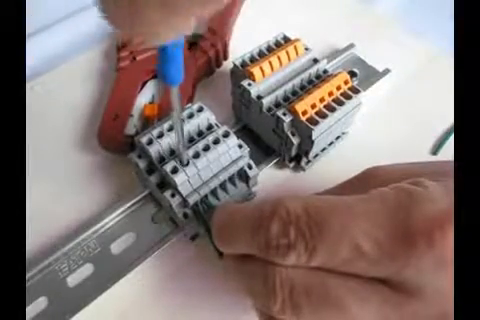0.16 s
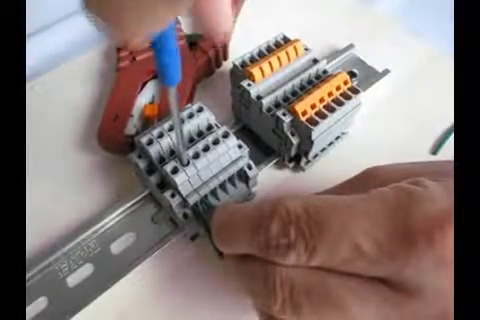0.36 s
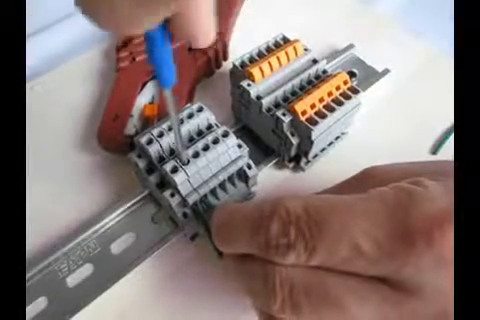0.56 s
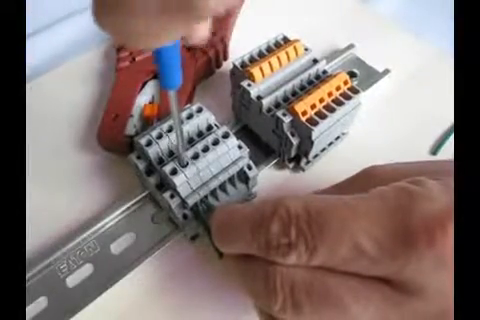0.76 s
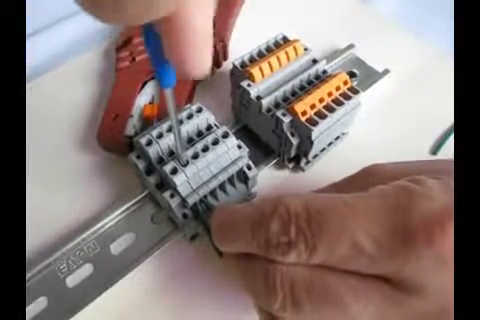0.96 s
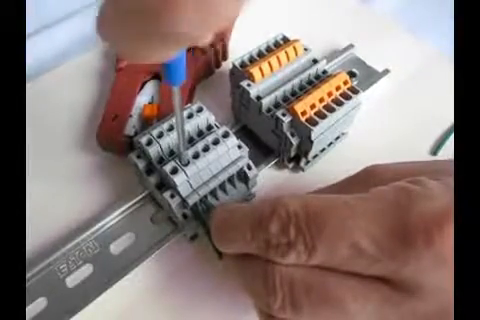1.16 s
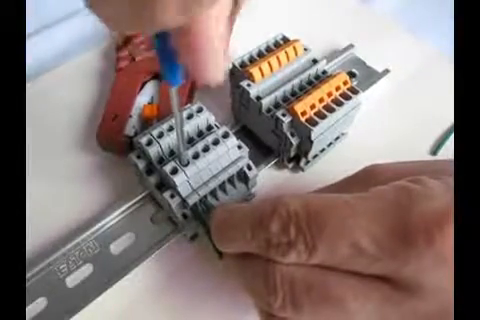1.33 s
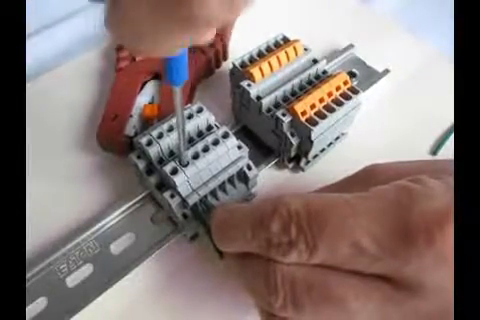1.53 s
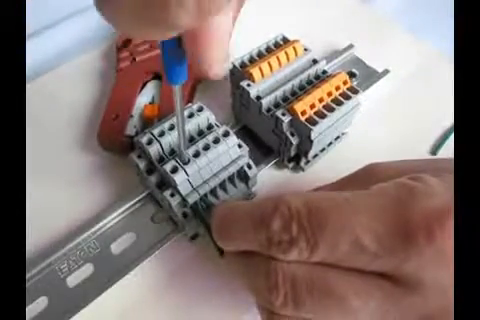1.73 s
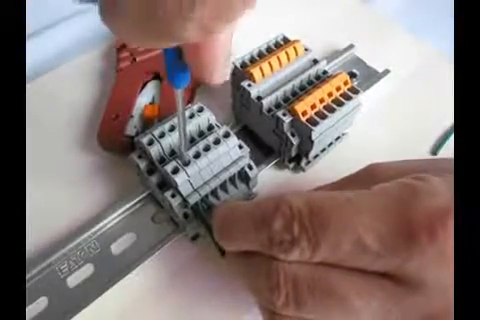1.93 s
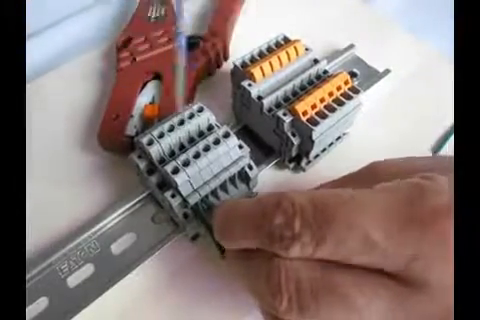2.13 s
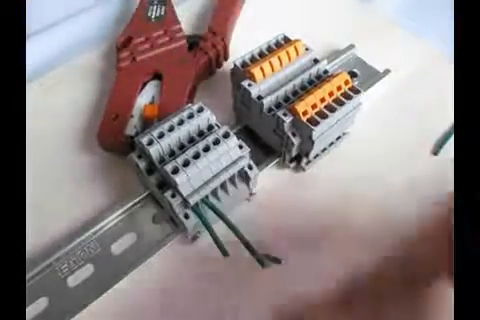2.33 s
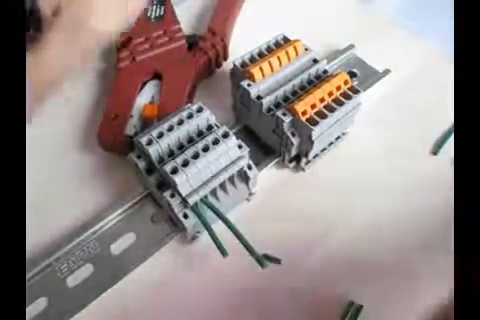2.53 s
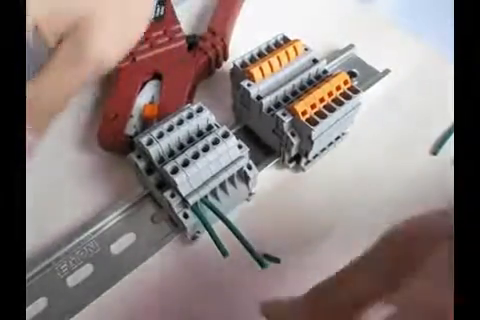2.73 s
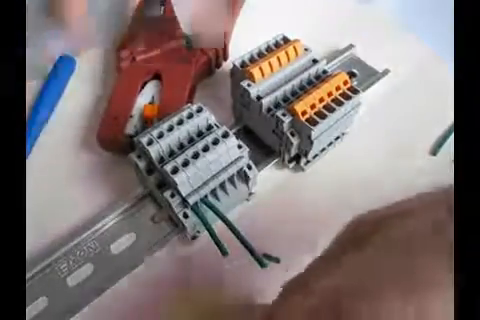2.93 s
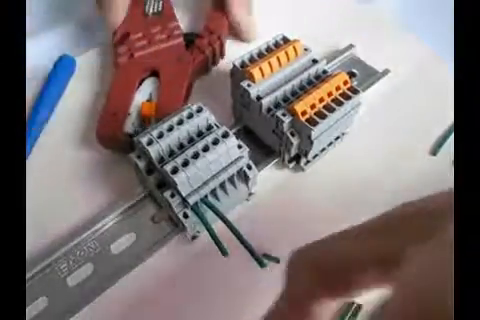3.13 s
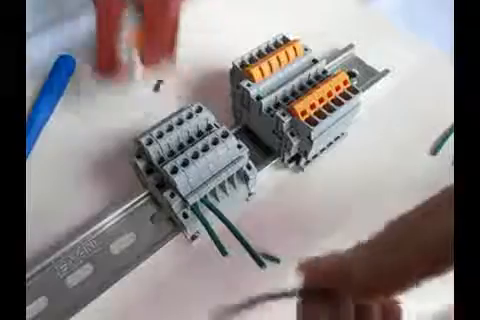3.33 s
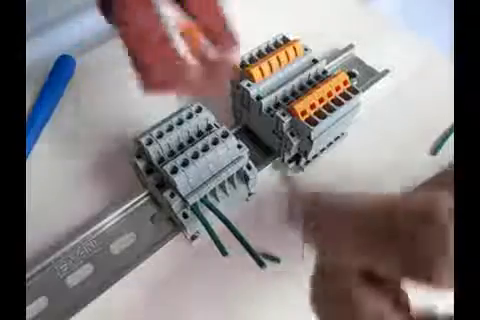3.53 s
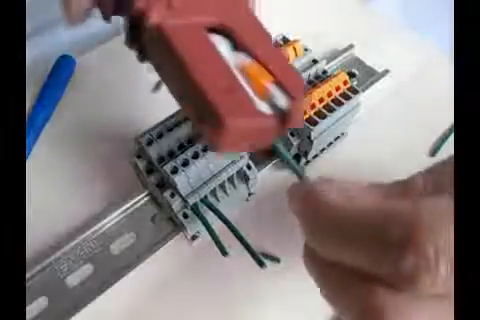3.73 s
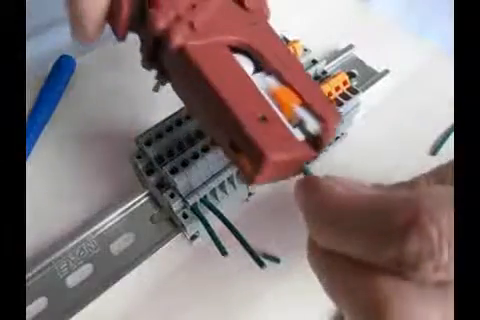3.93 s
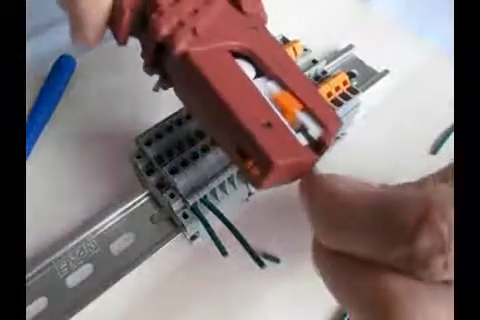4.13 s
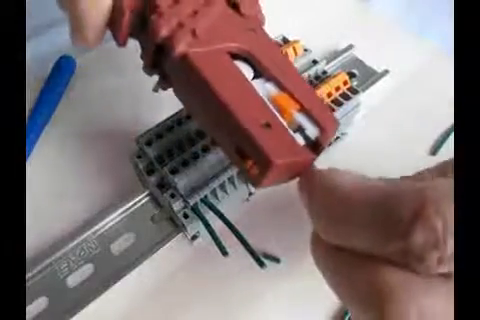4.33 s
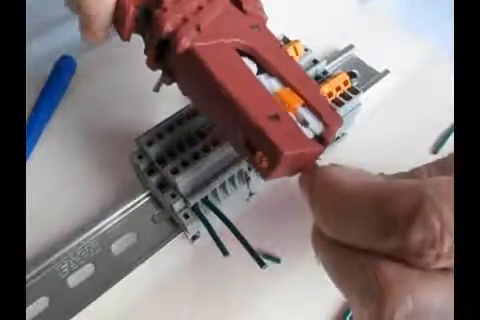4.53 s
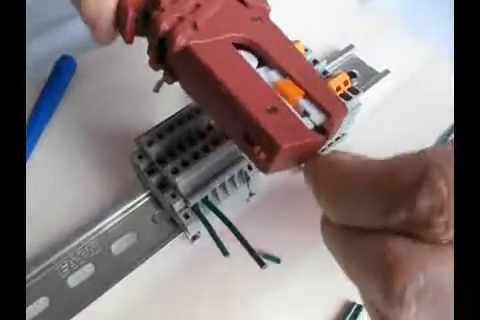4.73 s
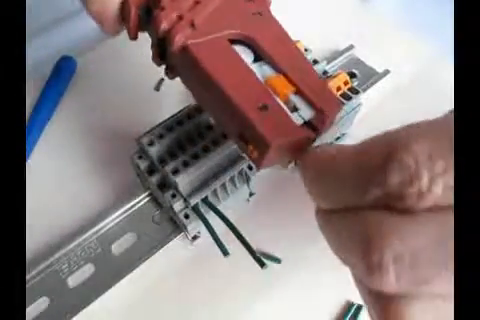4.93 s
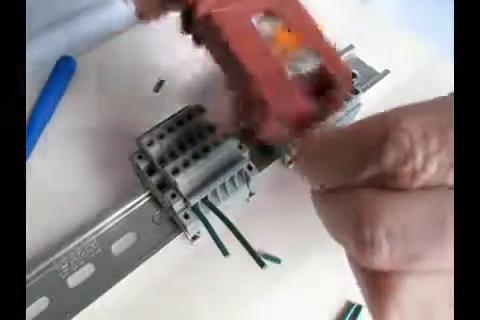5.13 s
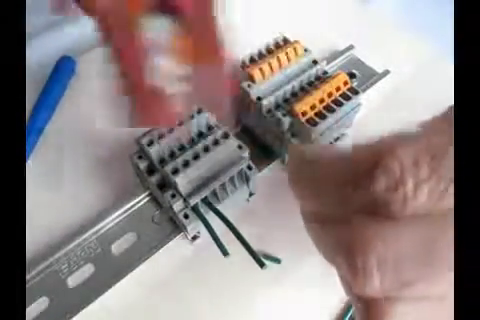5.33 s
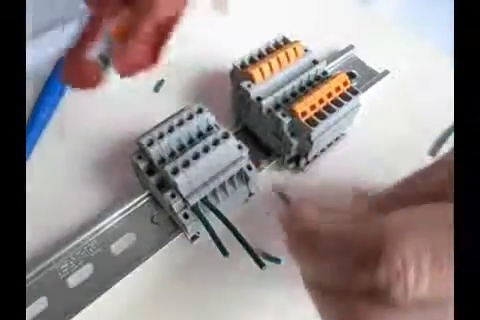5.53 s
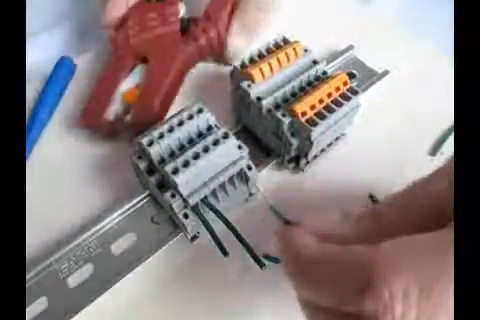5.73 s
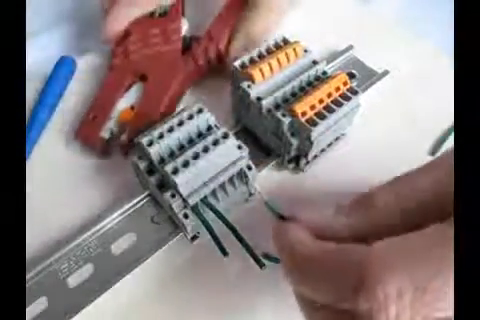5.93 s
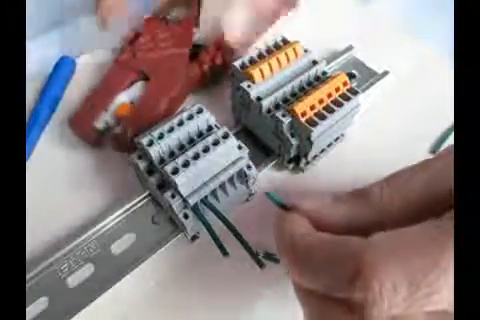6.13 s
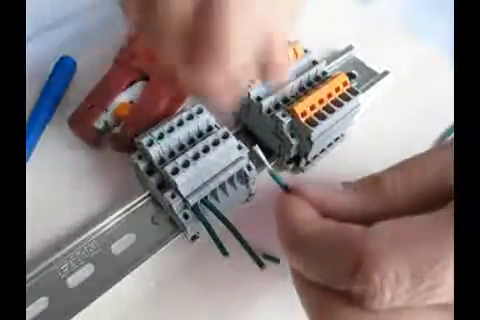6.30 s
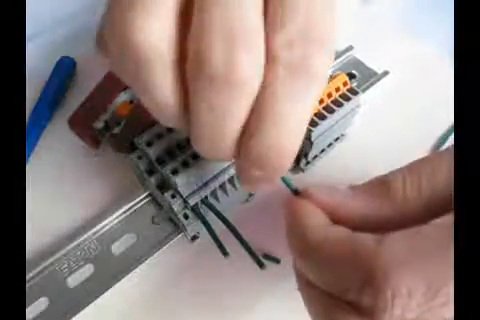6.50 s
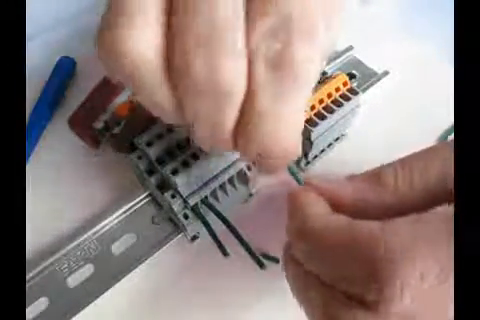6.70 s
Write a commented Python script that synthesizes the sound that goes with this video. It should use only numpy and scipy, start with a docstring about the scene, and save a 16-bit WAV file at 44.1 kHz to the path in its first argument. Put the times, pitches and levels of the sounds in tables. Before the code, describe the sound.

Small gritty screwdriver scrapes, tool knocks on a workbench and two sharp snaps of a wire stripper, heard close over faint hiss.

```python
"""Quiet workbench: hands turn a screwdriver in a terminal block, lay it down, lift a plastic wire
stripper, snap it shut on a wire, pull, let it spring open and set it down. Chattering contacts and
sliding grit shake four parts: bench, plastic shell, jaws, steel. A close microphone hears room rumble,
hiss and a thin whine; the hardest snaps overload it and pull its gain down."""
import sys
import numpy as np
from scipy import signal
from scipy.io import wavfile
from scipy.ndimage import uniform_filter1d

SR = 44100
rng = np.random.default_rng(int(sys.argv[2]) if len(sys.argv) > 2 else 0)


def to_wav(sig):
    """Store sig (one row per channel, or 1-D mono) as 16-bit WAV at the path in sys.argv[1].

    Samples outside -1..1 are clipped; the rate is SR.
    """
    pcm = np.clip(np.atleast_2d(sig), -1, 1) * 32767
    pcm = np.round(pcm).astype(np.int16)
    wavfile.write(sys.argv[1], SR, pcm.T)  # frames by channels


N = 298116

# modes of the four parts: f/Hz, width/Hz, level/dB
BENCH = [(570, 240, 7), (736, 260, -5.5), (1030, 610, 8), (1320, 860, -6.5)]
SHELL = [(1800, 250, -15), (2374, 360, 20.5), (2450, 3300, 2.5)]
JAWS = [(3143, 1100, -6.5), (3520, 960, -3.6), (4320, 850, 0.8), (5213, 360, -2.94), (6050, 700, 1)]
STEEL = [(6565, 1500, 12.5), (7200, 700, 0), (8470, 840, 5.5), (9590, 337, 0.5), (10780, 130, -1.5),
         (13500, 3000, -21)]
PARTS = (BENCH, SHELL, JAWS, STEEL)


def gain_of(db):
    return 10 ** (np.asarray(db) / 20)


def unit_rms(x):
    return x / np.sqrt(np.mean(x ** 2) + 1e-20)


def curve_at(points, hz):
    point_hz, value = np.transpose(points)
    return np.interp(np.log(hz + 1), np.log(point_hz + 1), value)


def add(mix, start_s, sound):
    part = mix[round(start_s * SR):][:len(sound)]
    part += sound[:len(part)]


def air():
    """Lumpy rumble and smooth hiss."""
    # noise density: f/Hz, relative level/dB
    spectrum = [(8.8, -50), (15, -6.5), (49, -1.5), (87, -11), (171, -8.5), (208, -15.5), (275, -13),
                (325, -19), (2880, -37.5), (5480, -40.5), (5960, -40.5), (6490, -40), (12000, -38.5),
                (15600, -79), (22000, -120)]
    frames, hz = N // 512 + 5, np.fft.rfftfreq(2048, 1 / SR)
    real, imag, patches = rng.standard_normal((frames, 1025, 3)).T
    patches = unit_rms(uniform_filter1d(uniform_filter1d(patches, 20, 0), 8, 1))
    density_db = curve_at(spectrum, np.minimum(hz, 10000))[:, None] + .8 * patches
    noise = signal.istft((real + 1j * imag) * gain_of(density_db), nperseg=2048, noverlap=1536)[1]
    return gain_of(-44.5) * unit_rms(noise[:N])


def whine():
    """Thin steady sine."""
    # tone: f/Hz, rms level/dB
    tones = [(5879, -63)]
    t = np.arange(N) / SR
    return sum(gain_of(db) * np.sqrt(2) * np.sin(2 * np.pi * hz * t) for hz, db in tones)


def room(x):
    """Sparse reflections of random sign, each band dying at its own rate."""
    # reverberation: f/Hz, T60/s
    decay = [(300, 0.27), (1000, 0.13), (3000, 0.11), (10000, 0.14)]
    taps = np.zeros(SR // 2)
    slots = np.arange(200, len(taps) - 20, 20)
    taps[slots + rng.integers(0, 20, len(slots))] = rng.choice([-1., 1.], len(slots))
    hz, t, bands = signal.stft(taps, SR, nperseg=256)
    tail = signal.istft(bands * gain_of(-60 * t / curve_at(decay, hz)[:, None]), SR, nperseg=256)[1]
    return signal.fftconvolve(x, tail / np.linalg.norm(tail))[:N]


def rings(fade_db=-4):
    """Fluttering tones that hang after a knock or snap: narrow noise bands."""
    # tones: start/s, end/s, f/Hz, width/Hz, level/dB
    tones = [(2.74, 2.858, 263.4, 60, -47), (2.743, 2.907, 1940, 260, -51.5),
             (3.12, 3.318, 259.7, 60, -45.5), (3.36, 3.46, 2360, 280, -47), (4.77, 4.95, 1980, 6.3, -59.5),
             (5.188, 5.285, 3300, 9, -38), (5.215, 5.29, 4640, 30, -46.5), (5.256, 5.329, 4200, 40, -45),
             (5.275, 5.368, 2190, 11, -35.5), (5.42, 5.62, 2166, 100, -46.5),
             (6.14, 6.268, 258, 110, -39.5), (6.145, 6.232, 2250, 110, -55)]
    out = np.zeros(N)
    for start_s, end_s, hz, width_hz, db in tones:
        t = np.arange(0, end_s - start_s, 1 / SR)
        pole = [1, -np.exp(-np.pi * width_hz / SR)]
        drive = rng.standard_normal(SR // 2) + 1j * rng.standard_normal(SR // 2)
        flutter = signal.lfilter([1], pole, signal.lfilter([1], pole, drive))[-len(t):]
        fade = gain_of(db + fade_db * t / t[-1]) * signal.windows.tukey(len(t), .3)
        add(out, start_s, fade * unit_rms((flutter * np.exp(2j * np.pi * hz * t)).real))
    return out


def struck(modes, detune=1):
    """Unit-energy impulse response; a small part radiates little below its lowest mode."""
    t = np.arange(1024) / SR
    ring = sum(gain_of(db) * np.sqrt(width_hz) * np.exp(-np.pi * width_hz * t)
               * np.sin(2 * np.pi * hz * detune * t) for hz, width_hz, db in modes)
    ring = signal.sosfilt(signal.butter(4, .88 * modes[0][0], "high", fs=SR, output="sos"), ring)
    return ring / np.linalg.norm(ring)


def ticks(size, spread_db):
    """Dense tiny impacts, a few large."""
    return rng.standard_normal(size) * gain_of(spread_db * np.minimum(rng.exponential(1, size), 4))


def stroke(length_s, db, change_db, dull):
    """Sliding grit: dull strokes shake bench and shell, bright ones jaws and steel."""
    t = np.arange(0, length_s + .014, 1 / SR)  # the hand glides on a moment
    grit = ticks(len(t), spread_db=2.3)
    bench, shell, jaws, steel = (signal.oaconvolve(grit, struck(modes))[:len(t)] for modes in PARTS)
    rub = dull * unit_rms(.88 * bench + shell) + (1 - dull) * unit_rms(1.08 * jaws + steel + .12 * shell)
    ramp_db = np.interp(t, [0, length_s], [db, db + change_db])
    return gain_of(ramp_db) * rub * signal.windows.tukey(len(t), .06)


def finger_slips():
    """Fingers slip off the handle after a turn."""
    # slips: t/s, length/s
    slips = [(0.097, .025), (0.19, 0.023), (0.373, 0.033), (0.444, 0.044), (0.605, 0.051), (0.748, 0.02),
             (0.872, 0.11), (1.175, .055), (1.254, .02)]
    out = np.zeros(N)
    for start_s, length_s in slips:
        add(out, start_s, stroke(length_s, db=-44, change_db=-25, dull=.34))
    return out


def slides():
    """Tools and fingers rub as they slide."""
    # strokes: t/s, length/s, level/dB, change/dB, dullness/0-1
    strokes = [(0.036, 0.04, -51.5, 7, 0.23), (0.536, 0.069, -60, 11, 0.36), (1.274, .07, -57.5, 4, .4),
               (2.136, 0.014, -38.5, 2.5, 0.36), (2.173, 0.63, -55, -7, 0.29),
               (2.576, 0.037, -57, 11.5, 0.33), (2.65, 0.073, -43.5, 5, 0.33),
               (2.754, 0.079, -26, -25, 0.55), (2.826, 0.15, -50.5, 0.5, 0.38),
               (3.102, 0.14, -43, 5.5, 0.46), (3.269, 0.066, -35, -14, 0.49),
               (3.352, 0.053, -46, 4.5, 0.09), (3.962, 0.039, -52, -23, .3), (4.73, 0.094, -49, -8, 0.4),
               (5.064, 0.079, -56, 24, 0.31), (5.16, 0.042, -23, -13.5, 0.4), (5.195, .09, -43, 8.5, .2),
               (5.299, 0.11, -39.5, 5.5, .3), (5.434, 0.18, -30.5, -19.5, 0.1),
               (5.536, 0.24, -33, -24, 0.25), (5.785, 0.18, -51.5, -1, 0.35),
               (5.989, 0.18, -46, -18.5, 0.5), (6.082, .045, -59.5, 12.5, 0.1),
               (6.146, .035, -32.5, -32, 0.2), (6.213, 0.097, -61, 5, 0.44)]
    out = np.zeros(N)
    for start_s, *shape in strokes:
        add(out, start_s, stroke(*shape))
    return out


def contact(mix, start_s, db, parts_db, chatter_ms, rise_ms, spread_db=1.5):
    """A burst of chatter shakes the parts; parts_db offsets bench, shell, jaws, steel."""
    t_ms = np.arange(2048) / SR * 1000
    attack = 1 - np.exp(-(t_ms / rise_ms) ** 2)
    decay = np.exp(-(t_ms / (rise_ms + chatter_ms)) ** 1.255)
    force = attack * decay * ticks(len(t_ms), spread_db)
    detunes = 1 + .03 * rng.standard_normal(4)  # the grip detunes each part
    for part_db, modes, detune in zip(parts_db, PARTS, detunes):
        sound = signal.fftconvolve(force, struck(modes, detune))
        sound = sound / np.linalg.norm(sound) * np.sqrt(.01 * SR)  # energy of 10 ms at rms 1
        add(mix, start_s, gain_of(db + part_db) * sound)


def tool_scrapes(rise_ms=5.5):
    """Gritty scrapes with a soft onset: the turning screwdriver, later one as a tool is handled."""
    # scrapes: t/s, jaws level/dB, steel re jaws/dB, chatter/ms
    scrapes = [(0.067, -46, 7.5, 2.8), (.079, -31, -1.5, 2.1), (.102, -38, -0.5, 3.1), (.185, -49, -3, 7.2),
               (0.301, -44.5, -5, 43), (0.324, -31.5, -1, 11), (.339, -29, 2, 1.2), (.362, -28, 1, 1.3),
               (0.445, -49.5, 0, 5.4), (.593, -45, 1, 8), (0.606, -46.5, -14, 5.9), (.642, -51.5, -8, 5.8),
               (.728, -41.5, -0.5, 5.3), (0.876, -55, 8, 18), (0.909, -44.5, -1, 8.7), (1.25, -60, 3, 8),
               (1.354, -37.5, 1, 21), (1.369, -42.5, 4.5, 5.7), (1.5, -49, -2, 11),
               (1.679, -54.5, -1.5, 7.1), (1.798, -56.5, 2, 8.8), (3.418, -43, 10.5, 5.2)]
    out = np.zeros(N)
    for at_s, db, steel_db, chatter_ms in scrapes:
        start_s = at_s - .5 * rise_ms / 1000
        contact(out, start_s, db, (-14, -8, 0, steel_db), chatter_ms, rise_ms, spread_db=3.5)
    return out


def bench_knocks():
    """Tools hit the bench; the steel follows the jaws."""
    # knocks: t/s, bench level/dB, shell re bench/dB, jaws re bench/dB, chatter/ms
    knocks = [(2.633, -28.5, -2, 8.5, 4), (2.7294, -11, 1.5, 2.5, 1.4), (2.7345, -17.5, 1, 4, 2.6),
              (2.748, -33, -6, 1, 4.6), (2.846, -50.5, 4, -6, 3), (2.864, -45.5, -8, -28, 1.8),
              (2.88, -44.5, -8, -27, 11), (2.937, -52, 8.5, 3, 1.7), (3.096, -45.5, -1.5, 3, 3.3),
              (3.149, -32.5, -1.5, -23, 4.8), (3.212, -34.5, 6.5, -8, 3.5), (3.259, -23.5, -7.5, -28, 4.5),
              (5.989, -24.5, -12, -7.5, 1.3), (6.043, -46.5, -16, -19.5, 3.6), (6.111, -35.5, -11, -10, 6),
              (6.128, -40, -9.5, -14, 5.8), (6.136, -19.5, -16, -26, 2.3), (6.1378, -17, 7.5, -5.5, 0.71),
              (6.161, -36, -11.5, -6, 2.1), (6.2015, -32, -25, -28, 3), (6.2115, -35, -3, -27, 4.8)]
    out = np.zeros(N)
    for start_s, db, shell_db, jaws_db, chatter_ms in knocks:
        contact(out, start_s, db, (0, shell_db, jaws_db, jaws_db - 1.8), chatter_ms, rise_ms=.2)
    return out


def tool_snaps():
    """Hand-held tools click and snap, barely shaking the bench."""
    # clicks: t/s, jaws level/dB, shell re jaws/dB, steel re jaws/dB, chatter/ms
    clicks = [(0.0448, -42.5, -7, -13, 2.8), (.1945, -54, -1, -5, 1.5), (.2992, -53, -4, 0, 1),
              (.435, -54, -2, 5, 2.5), (.5382, -57, -5, 2, 1.5), (.5487, -56, -8, 4, 2.5),
              (0.5643, -51, -8, -6, 2.8), (0.8373, -51, -6, -12, 1.4), (.9, -54, -10, 3, 1.5),
              (1.1718, -51, -7, 2, 2.5), (1.187, -53, -14, 2, 2.5), (1.204, -56, 1, -9, 1),
              (1.6302, -52.5, -1.5, 0.5, 2.7), (2.135, -28.5, -7, -8, 4.3), (2.379, -58.5, 4.5, 1, 3.3),
              (2.555, -39, -5, -12, 2), (3.185, -32.5, -4.5, 1, 9.1), (3.349, -43, 12.5, 2, 1.6),
              (3.791, -46.5, -5, -5, 1.5), (3.949, -41, -5, -11, 5.5), (3.998, -76, 21, 0, 2.7),
              (4.118, -69, 19.5, -9, 2.7), (4.613, -46, -0.5, -38, 5.9), (4.6909, -33, 6, 3, 2),
              (4.698, -11.5, -6, -1.5, 1), (4.71, -48, -5, -3, 3.3), (4.728, -47, 3, 2, 2.9),
              (5.044, -47, 12.5, -12.5, 1.7), (5.15, 0.5, -7, -1.5, 3.3), (5.1544, -15.5, -3, 3, 1.1),
              (5.167, -31, -4, 6, 2.9), (5.207, -34.5, -22, 6.5, 1.6), (5.236, -47.5, 5.5, 11.5, 1.9),
              (5.258, -36.5, -7, 3, 1.6), (5.279, -33, 0.5, -11.5, 3.8), (5.297, -27, -12, 0, 1.6),
              (5.331, -36.5, -15, -4, 2.7), (5.346, -24.5, 1, -7, 2.3), (5.3995, -28, -14, 4, 2),
              (5.4005, -18.5, -2.5, -12, 2.1), (5.4136, 0, -3.5, -1, 1.94), (5.4171, -8, -7, 1.5, 1.1),
              (5.429, -40, -8, 9.5, 2.6), (5.527, -29.5, -12, 1, 9.2), (5.626, -41.5, -18, 4, 2.6),
              (5.659, -44, -5, -28, 3.6), (5.689, -45, -2, 10, 3), (5.706, -48, -25, 5, 2),
              (6.494, -43, -5, 0, 1.8)]
    out = np.zeros(N)
    for start_s, db, shell_db, steel_db, chatter_ms in clicks:
        contact(out, start_s, db, (-24, shell_db, 0, steel_db), chatter_ms, rise_ms=.37)
    return out


def scene():
    """Close tools, faint reverberation, background; mono."""
    near = tool_scrapes() + bench_knocks() + tool_snaps() + finger_slips() + slides() + rings()
    return (near + gain_of(-15.5) * room(near) + air() + whine())[None]


def record(dry, threshold_db=-10, edge_hz=16064):
    """Gain ducking after the hardest snaps, overload, treble roll-off, band limit."""
    # treble response: f/Hz, gain/dB
    treble = [(9800, -2), (10600, -6), (11400, -14.5), (11900, -41.5), (12400, -11), (15000, -15),
              (15900, -21)]
    power_db = 10 * np.log10(abs(signal.lfilter(np.ones(400) / 400, 1, dry[0] ** 2)) + 1e-12)
    release_db = np.arange(N) * 60. / SR
    peak_db = np.maximum.accumulate(power_db + release_db) - release_db
    over_db = np.maximum(peak_db - threshold_db, 0)
    late_db = signal.lfilter(np.ones(600) / 600, 1, over_db)  # gain lags the snap
    clipped = np.clip(dry / gain_of(.71 * late_db), -.86, .86)
    thump = signal.sosfilt(signal.butter(1, (120, 900), "band", fs=SR, output="sos"), clipped ** 2)
    lopsided = clipped + .12 * thump  # asymmetric overload
    hz = np.linspace(0, SR / 2, 513)
    roll_off = signal.firwin2(511, hz, gain_of(curve_at(treble, hz)), fs=SR)
    band_limit = signal.firwin(511, edge_hz, window=("kaiser", 9), fs=SR)
    dulled = signal.oaconvolve(lopsided, roll_off[None], "same")
    return signal.oaconvolve(dulled, band_limit[None], "same")


dry = scene()
out = record(dry)
to_wav(out)
```